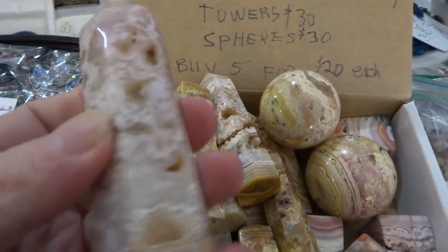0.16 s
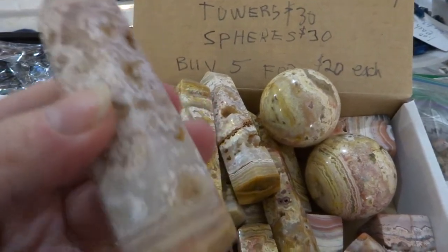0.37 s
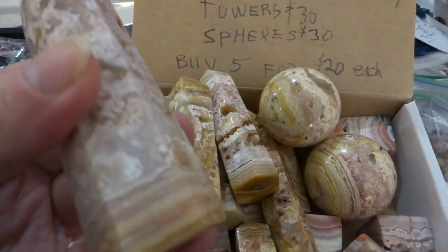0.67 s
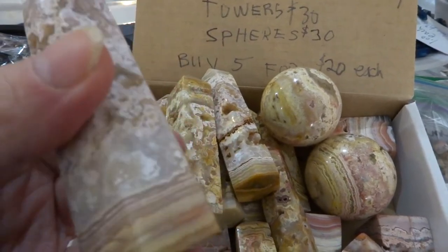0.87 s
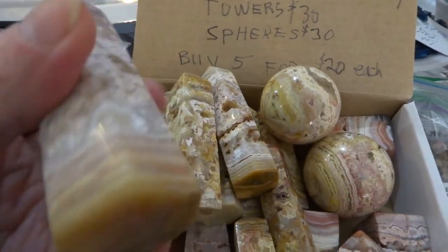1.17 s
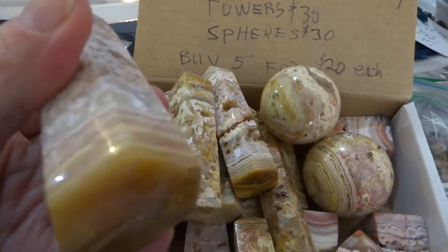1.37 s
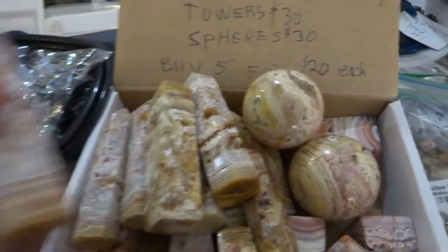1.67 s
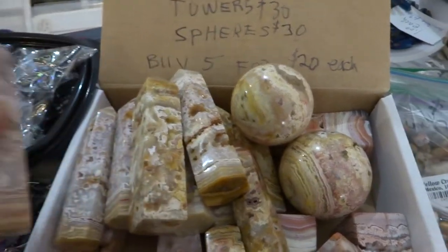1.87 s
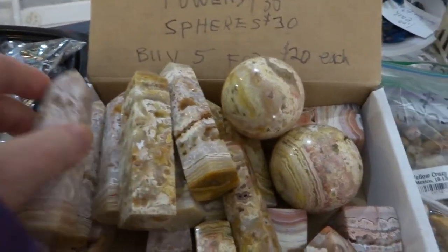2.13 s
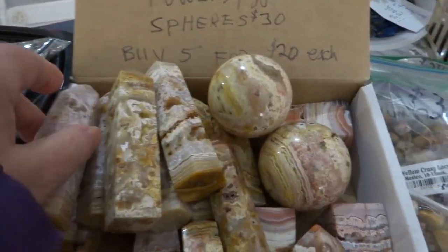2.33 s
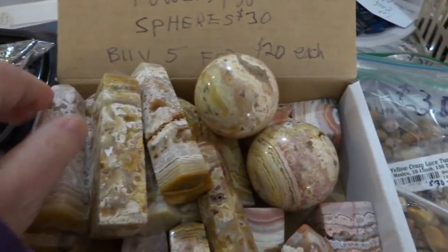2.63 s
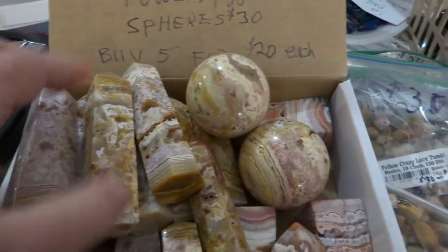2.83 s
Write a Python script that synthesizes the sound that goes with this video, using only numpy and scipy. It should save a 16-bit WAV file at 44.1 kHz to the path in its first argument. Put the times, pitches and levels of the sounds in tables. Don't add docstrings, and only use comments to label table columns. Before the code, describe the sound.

Hard stone clacks and a brief gritty slide as a stone is laid among others indoors

```python
import sys
import numpy as np
from scipy import signal
from scipy.fft import rfft, irfft
from scipy.io import wavfile

SR = 44100
rng = np.random.default_rng(int(sys.argv[2]) if len(sys.argv) > 2 else 0)


def gain_from_decibels(decibels):
    exponent = np.asarray(decibels, float) / 20
    return 10 ** exponent


def file_out(sig):
    cols = np.atleast_2d(sig).T
    lim = np.clip(cols, -1, 1)
    pcm = np.round(lim * 32767).astype(np.int16)
    wavfile.write(sys.argv[1], SR, pcm)


N = 132300
REACH = int(2.1 * SR)
EDGES = 30 * 2 ** np.arange(0, 9.1, .5)
CENTRES = np.sqrt(EDGES[1:] * EDGES[:-1])


def rms_one(x):
    return x / np.sqrt(np.mean(x ** 2) + 1e-20)


def in_time(rows, column=1):
    rows = np.array(rows)
    return np.interp(np.arange(N) / SR, rows[:, 0], rows[:, column])


def at_hz(points, hz):
    points = np.array(points)
    return np.interp(np.log(hz), np.log(points[:, 0]), points[:, 1])


def drift(rate):
    r = np.exp(-80 * np.pi * rate / SR)
    noise = rng.standard_normal(N // 40 + 2002)
    slow = signal.lfilter([1], [1, -2 * r, r * r], noise)[2000:]
    return np.interp(np.arange(N) / 40, np.arange(len(slow)), rms_one(slow))


def ring(clicks, hz, t60):
    r, w = gain_from_decibels(-60 / (t60 * SR)), 2 * np.pi * hz / SR
    return signal.lfilter([0, np.sin(w)], [1, -2 * r * np.cos(w), r * r], clicks + 1e-18)


def bands(white):
    out = []
    for k, (lo, hi) in enumerate(zip(EDGES, EDGES[1:])):
        sos = signal.butter(2, [lo, hi], "band", fs=SR, output="sos")
        out.append(signal.sosfilt(sos, white[k % 2]))
    return out


def spread(pair, alike):
    alike = np.clip(alike, -.9, .999)
    return np.sqrt(1 + alike) * pair[0] + np.sqrt(1 - alike) * pair[1] * [[1], [-1]]


def add(out, s, sound):
    part = out[..., int(s * SR):int(s * SR) + sound.shape[-1]]
    part += sound[..., :part.shape[-1]]


# frequency in Hz, left-right correlation.
LIKENESS = [(60, 0.85), (170, 1), (500, -0.36), (1420, 0.036), (4080, 0.71), (11700, 0.8652)]


def hiss(spectrum, patchy_db):
    together, out = drift(1.1), 0
    for hz, pair in zip(CENTRES, bands(rng.standard_normal((2, 2, N)))):
        level_db = at_hz(spectrum, hz) + patchy_db * (together + drift(20))
        out = out + gain_from_decibels(level_db) * spread(pair, at_hz(LIKENESS, hz))
    return rms_one(out)


# frequency in Hz, density in dB per Hz.
AIR = [(60, -2), (220, -6), (400, 1), (700, -4), (1600, -1.5), (2700, -3.5), (6000, -3.5), (11000, -12)]
# frequency in Hz, width in Hz, level in dB.
DUCT = [(880, 58, -58), (1335, 71, -69.5), (1815, 42, -70.5), (2016, 67.43, -71.5), (2287, 125.7, -73),
        (3770, 150, -77)]
# time in seconds, broad hiss in dB, duct hum in dB.
DRAUGHT = [(0, 0.5, -1), (.35, -0.5, -0.5), (.65, 2, 1.5), (1.0, 1, 0), (1.45, 0, -1), (1.7, -1.5, 3.5),
           (2.1, 2, 0), (2.8, 5, 3), (3, 0, 0)]


def ventilation():
    hum = 0
    for hz, width_hz, db in DUCT:
        t60 = np.log(1000) / np.pi / width_hz
        pair = ring(rng.standard_normal((2, N)), hz, t60)
        hum = hum + gain_from_decibels(db + 1.13 * drift(6.0)) * rms_one(spread(pair, at_hz(LIKENESS, hz)))
    air = gain_from_decibels(-61.5 + in_time(DRAUGHT)) * hiss(AIR, patchy_db=-0.25)
    return air + gain_from_decibels(in_time(DRAUGHT, column=2)) * hum


# time in seconds, level in dB.
SLEEVE = [(0, -75), (.5, -69.5), (1.0, -68.5), (1.5, -73), (1.58, -60), (1.9, -60.5), (2.1, -54),
          (2.7, -59.5), (2.8, -65), (2.85, -53.5), (2.9, -65), (3, -61.5)]
# frequency in Hz, density in dB per Hz.
CLOTH = [(150, -7.5), (500, -1), (1500, -9), (3000, -3.5), (4800, -12.5), (6600, -3), (8500, -9.5),
         (10500, -10)]
# frequency in Hz, width in Hz, start in seconds, end in seconds, level in dB.
CREASES = [
    (10400, 900, 1.535, 1.575, -64),
    (9700, 900, 1.65, 1.95, -67.5),
    (8200, 700, 1.6, 1.75, -73),
    (6550, 900, 1.85, 2.18, -67),
    (620, 130, 1.6, 1.64, -61),
    (430, 140, 2.8, 2.9, -62),
]


def sleeve():
    out, t = gain_from_decibels(in_time(SLEEVE)) * hiss(CLOTH, patchy_db=1.5), np.arange(SR // 2) / SR
    for hz, width_hz, start, end, db in CREASES:
        t60 = np.log(1000) / np.pi / width_hz
        pair = ring(rng.standard_normal((2, len(t))), hz, t60)
        swell = np.clip(np.minimum(t, end - start - t) / 0.018, 0, 1)
        add(out, start, gain_from_decibels(db) * swell * rms_one(spread(pair, at_hz(LIKENESS, hz))))
    return out


KNOCK_S = [2.1886, 2.2125, 2.3140, 2.3205, 2.3326, 2.3452, 2.4870, 2.4905, 2.5118, 2.5228, 2.5284]
# crack in dB, contact sharpness in Hz, chatter in dB, chatter length in seconds.
KNOCKS = [(-7.5, 7900, -17, 0.013), (-22, 1900, -34, 0.00582), (-25.5, 800, -55, 0.0033),
          (-34, 1000, -41, .004), (-7, 5500, -18.5, 0.0077), (-8.5, 3400, -20.5, 0.0063),
          (-30, 1200, -34, 0.003483), (-16, 3800, -46, 0.002202), (-4, 7700, -15.5, 0.011418),
          (-11.5, 2082, -26, 0.0035), (-7.5, 4700, -17, 0.018)]
# frequency in Hz, level in dB, t60 in seconds.
CRACK = [(806.1, -8.5, 0.0091), (1405, -6.5, 0.0087), (2400, -6, 0.0074), (3205, -1.5, 0.01),
         (4315, -3, 0.0082), (5550, -7, 0.0053), (6900, -8, 0.0042), (9117.7, -13.5, 0.007413)]


def cracks():
    out, click = np.zeros(N), np.eye(1, 2048)[0]
    for s, (db, sharp_hz, _, _) in zip(KNOCK_S, KNOCKS):
        push = signal.lfilter(*signal.butter(2, sharp_hz, fs=SR), click)
        push = push * SR / 2 / (sharp_hz + 2000)
        for k, (hz, level_db, t60) in enumerate(CRACK):
            strength = gain_from_decibels(db + level_db + rng.normal(0, 1.8))
            add(out, s, (-1) ** k * strength * ring(push, hz, t60))
    return 0.23 * out


def grains(per_s, spread_db):
    hits = rng.random(N) < per_s / SR
    size = gain_from_decibels(spread_db * np.minimum(rng.exponential(1, N), 4))
    return rms_one(hits * size * rng.choice([-1, 1], N))


def body(drive, modes):
    sound = 0
    for k, (hz, db, t60) in enumerate(modes):
        sound = sound + (-1) ** k * gain_from_decibels(db) * ring(drive[REACH:], hz, t60) / np.sqrt(t60 * SR)
    return np.pad(sound, (REACH, 0))


# frequency in Hz, level in dB, t60 in seconds.
BODY_MODES = [(325, -11, 0.031), (568, -4.5, 0.026), (781, 1, 0.027), (1094, -0.5, 0.015), (1440, 2, 0.023),
              (1848, -2.5, 0.013), (2297, -1, 0.019), (2700, -1, 0.02), (3060, -0.5, 0.01),
              (3625, 0, 0.016), (4140, -0.5, 0.0096), (5030, -4.5, .007), (6240, -9.5, .005),
              (8040, -16, 0.0046)]


def chatter():
    lead_in_s, fade_s = 0.0013, 0.0015
    t, hold = np.arange(N) / SR, 0
    for s, (_, _, db, length) in zip(KNOCK_S, KNOCKS):
        before = np.maximum(s - t, 0) / lead_in_s
        after = np.maximum(t - s - length, 0) / fade_s
        hold = hold + gain_from_decibels(db) * np.exp(-before - after)
    return body(hold * grains(per_s=2500, spread_db=3.0), BODY_MODES)


# frequency in Hz, level in dB, t60 in seconds.
RING = [
    [(10440, 0, 0.09), (10700, -6.5, 0.04)],
    [(10920, 2.5, 0.11), (10900, -8, 0.04), (11080, -10, 0.05)],
]
RUNG_KNOCKS = [0, 4, 8, 10]
# lower tower in dB, upper tower in dB.
RUNG = [
    (-37, -29),
    (-34, -46),
    (-36.5, -43),
    (-41, -35),
]


def rings():
    free_s, closing_s, grip_db = .016, .003, -11
    out, click = np.zeros(N), signal.unit_impulse(SR // 2)
    t = np.arange(SR // 2) / SR
    grip = gain_from_decibels(grip_db * np.clip((t - free_s) / closing_s, 0, 1))
    for knock, levels in zip(RUNG_KNOCKS, RUNG):
        for level_db, tower in zip(levels, RING):
            for hz, db, t60 in tower:
                add(out, KNOCK_S[knock], grip * gain_from_decibels(level_db + db) * ring(click, hz, t60))
    return out


# time in seconds, level in dB, frequency in Hz, t60 in seconds.
THUMPS = [
    (2.189, -51, 260, .06),
    (2.333, -47, 60, 0.11),
    (2.336, -36.5, 309, 0.15),
    (2.488, -53, 79.8, .06),
    (2.53, -58, 190, 0.34),
]


def thumps():
    out = np.zeros(N)
    for s, db, hz, t60 in THUMPS:
        add(out, s, gain_from_decibels(db) * ring(signal.unit_impulse(SR // 2), hz, t60))
    return out


# time in seconds, rumble of card in dB, scratch of stone in dB.
SLIDE = [(2.27, -62, -68), (2.31, -39, -55), (2.37, -32, -39), (2.43, -34, -46), (2.48, -30.5, -37),
         (2.56, -34, -26.5), (2.62, -42.5, -32), (2.7, -56, -47), (2.78, -67, -58)]
# frequency in Hz, level in dB, t60 in seconds.
CARD = [(412, -5.5, .02), (610, -2.5, .03), (821.53, 1.5, 0.029), (1158, -1, 0.018)]
# frequency in Hz, density in dB per Hz.
SCRATCH = [(700, -11), (1500, 0.5), (3300, 2), (6000, -6), (11000, -14)]


def slide():
    drive = grains(per_s=3000, spread_db=2.6) * gain_from_decibels(2.5 * drift(30))
    rub = (drive * gain_from_decibels(in_time(SLIDE, column=2)))[REACH:]
    scratch = 0
    for hz, band in zip(CENTRES[8:], bands([rub, rub])[8:]):
        scratch = scratch + gain_from_decibels(at_hz(SCRATCH, hz)) * band
    return body(drive * gain_from_decibels(in_time(SLIDE)), CARD) + np.pad(scratch, (REACH, 0))


# frequency in Hz, t60 in seconds.
ROOM = [(250, 0.59), (700, 0.33), (2000, 0.52), (5000, 0.49), (10000, 0.42)]


def room(x):
    delay_s, alike = 0.005, 0.86
    t, tail = np.arange(SR // 2) / SR, 0
    for hz, pair in zip(CENTRES, bands(rng.standard_normal((2, 2, len(t))))):
        tail = tail + spread(pair, alike) * gain_from_decibels(-60 * t / at_hz(ROOM, hz))
    tail = tail * np.clip(t / delay_s - 1, 0, 1)
    tail = tail / np.sqrt(np.sum(tail ** 2) / 2)
    return signal.fftconvolve(x[None], tail, axes=1)[:, :N]


# frequency in Hz, left over right in dB.
STONE_PAN = [(60, 1.0), (170, -4), (500, 0.5), (1420, -0.5), (4080, 2), (11700, 3)]
# frequency in Hz, lead of the left in radians.
STONE_PHASE = [(250, .2), (550, 0.54), (1000, 0.22), (2000, .28), (5600, 0.44), (11000, .3)]


def at_microphones(stones):
    hz = np.arange(1, N // 2 + 2) * SR / N
    lean = gain_from_decibels(at_hz(STONE_PAN, hz) / 2) * np.exp(.5j * at_hz(STONE_PHASE, hz))
    spectrum = rfft(stones)
    return np.array([irfft(spectrum * lean, N), irfft(spectrum / lean, N)])


def scene():
    background = ventilation() + sleeve()
    stones = cracks() + chatter() + rings() + slide()
    box_cut = signal.butter(4, 262.02, "high", fs=SR, output="sos")
    stones = signal.sosfilt(box_cut, stones)
    return background + at_microphones(stones) + gain_from_decibels(-12.5) * room(stones) + thumps()


def top_cut(x):
    return signal.sosfilt(signal.butter(12, 12330, fs=SR, output="sos"), x)


def record(dry):
    x = signal.lfilter(*signal.butter(1, 310, "high", fs=SR), dry)
    x = signal.sosfilt(signal.ellip(12, .5, 60, 11050, fs=SR, output="sos"), x)
    return top_cut(x)


dry = scene()
out = record(dry)
file_out(out)
```